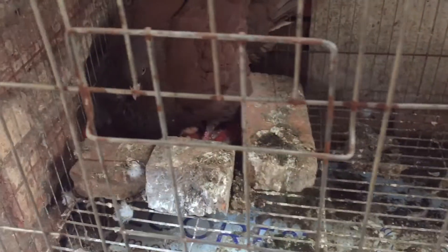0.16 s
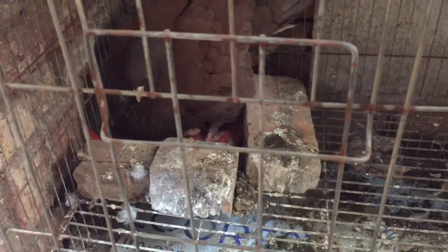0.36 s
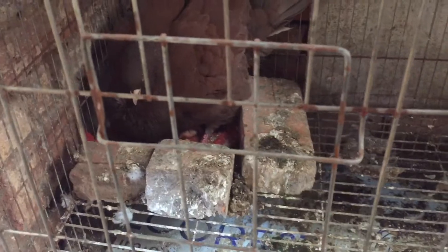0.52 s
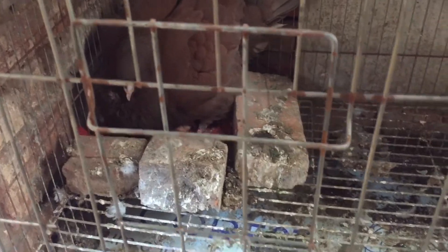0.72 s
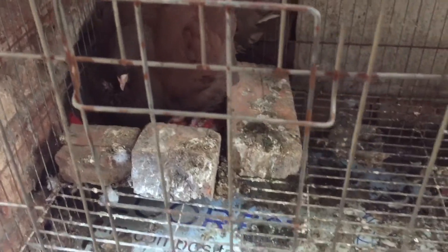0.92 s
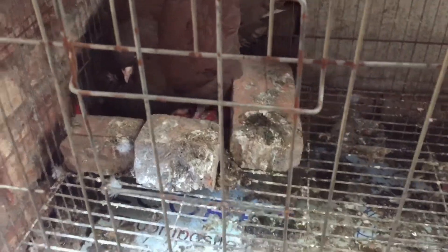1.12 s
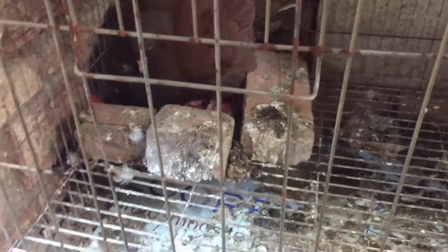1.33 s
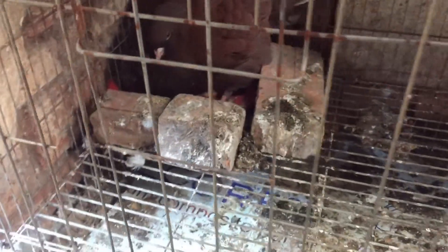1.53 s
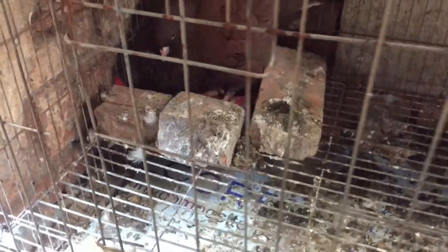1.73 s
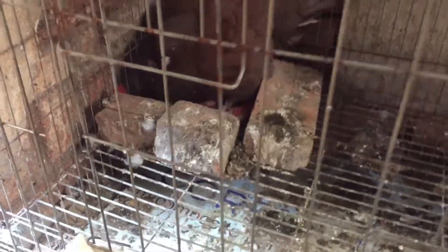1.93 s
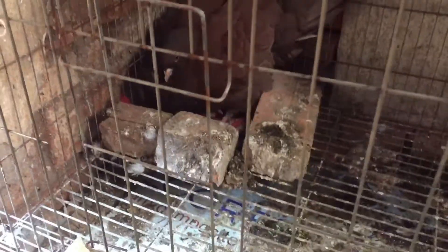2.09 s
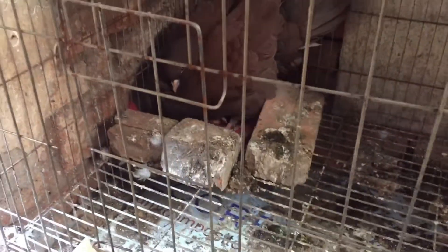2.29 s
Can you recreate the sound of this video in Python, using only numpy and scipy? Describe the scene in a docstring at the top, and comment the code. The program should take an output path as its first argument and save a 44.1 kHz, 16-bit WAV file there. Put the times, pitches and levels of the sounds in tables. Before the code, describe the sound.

Pigeon cooing, close and low: a clear gliding coo at 0.1-0.3 s turns hoarse and growling, ending in a gulp at 0.5. Faint higher notes from a farther bird come around 0.65 and 1.0. Short gulps follow at 1.1, 1.27 and 1.36, then growling from 1.5. Wire knocks peak near 1.75 amid rustling; hoarse coos fade to a low hum by 2.2. Short brick echoes, quiet rumbling yard.

```python
"""A wire cage before a brick nest corner in a yard, in mono, with pigeons cooing close by.
The near bird's clear coos and tonal gulps are gliding sines, its hoarse notes and a last low hum fluttering ones;
its growl and single gulps are also soft pushes that ring the air of throat and nest corner. A second bird,
farther off, answers higher in sines. Feet and feathers rustle as noise bursts that set the wire ringing; knocks
strike its modes. Brick walls return short echoes, and the yard is flickering noise over a lumpy low rumble."""
import sys
import numpy as np
from scipy import signal
from scipy.fft import rfft, irfft
from scipy.io import wavfile

SR = 44100
rng = np.random.default_rng(int(sys.argv[2]) if len(sys.argv) > 2 else 0)


def invert_db(level):
    """Linear amplitude ratio for a level in decibels (20 dB per decade), elementwise."""
    return 10 ** (np.asarray(level, dtype=float) / 20)


def master(y):
    """Save y as 16-bit WAV."""
    cut = np.clip(np.atleast_2d(y).T, -1, 1)
    pcm = np.round(cut * 32767)  # scale
    wavfile.write(sys.argv[1], SR, pcm.astype(np.int16))


N = 103635
T = np.arange(N) / SR   # time in s


def rms_one(x):
    """Scale a signal to rms 1."""
    return x / np.sqrt(np.mean(x ** 2) + 1e-20)


def drift(rate_hz):
    """Slow random wander of rms 1: white noise through two equal low-pass poles at rate_hz."""
    pole = np.exp(-2 * np.pi * rate_hz / SR)
    settle = 20000   # samples dropped while the filter fills
    white = rng.standard_normal(N + settle)
    return rms_one(signal.lfilter([1], [1, -2 * pole, pole * pole], white)[settle:])


def band(x, low_hz, high_hz, order=2):
    """Butterworth band-pass."""
    high_hz = min(high_hz, .45 * SR)
    return signal.sosfilt(signal.butter(order, [low_hz, high_hz], "band", fs=SR, output="sos"), x)


def strike(start_s, level_db, centre_hz, off_db, modes):
    """Each event softly pushes all modes into decaying rings; off_db is lost one octave off its centre."""
    mode_spread_db, push_cycles = 2.0, 1.4   # chance in a mode's strength; length of a push
    chance = rng.standard_normal((len(start_s), len(modes)))
    out = np.zeros(N)
    for k, (hz, mode_db, t60_s) in enumerate(modes):
        off_centre_db = off_db * np.log2(hz / centre_hz) ** 2
        push_db = level_db + mode_db - off_centre_db + mode_spread_db * chance[:, k]
        ring = np.zeros(N)
        np.add.at(ring, (start_s * SR).astype(int), invert_db(push_db))
        turn = np.exp(2j * np.pi * hz / SR)   # rotation of the mode per sample
        decay = invert_db(-60 / (t60_s * SR))
        soften = np.exp(-2 * hz / (push_cycles * SR))
        # one ringing pole, then two quickly decaying ones that round off the onset
        for pole, gain in ((decay, 1), (soften, 1 - soften), (soften, 1 - soften)):
            ring = signal.lfilter([gain], [1, -pole * turn], ring + 1e-18)
        out += ring.imag
    return out


def sine_notes(tables, waver_share, shimmer_db, rate_hz):
    """Sines with a faint octave follow each note's pitch and level while both waver at random."""
    edge_s, octave_db = 0.0056, -40   # fade outside each end of a note; second partial
    out, waver, shimmer = np.zeros(N), drift(rate_hz), drift(rate_hz)
    for rows in tables:
        s, hz, db = np.transpose(rows)
        pitch = np.interp(T, s, hz) * (1 + waver_share * waver)
        phase = 2 * np.pi * np.cumsum(pitch) / SR
        edge = np.clip(np.minimum(T - s[0], s[-1] - T) / edge_s + 1, 0, 1)
        level = invert_db(np.interp(T, s, db) + shimmer_db * shimmer)
        tone = np.sin(phase) + invert_db(octave_db) * np.sin(2 * phase)
        out += np.sqrt(2) * edge * level * tone   # sqrt(2): a sine of rms 1
    return out


# voice of the near bird's clear notes: pitch waver_share, level shimmer_db, rate_hz
CLEAR_VOICE = (.01, 1.2, 40)
# clear coos and tonal gulps of the near bird, one list a note: time_s, pitch_hz, level_db
CLEAR_NOTES = [
    [(.085, 436.7, -33.5), (.11, 377, -21), (.12, 426, -30.5), (.132, 366, -5), (.148, 337.7, -22.5),
     (.185, 345.7, -10.5), (.265, 367.5, -9.5), (.28, 346, -17)],
    [(.283, 396.5, -17.5), (.3, 396, -3.5), (.318, 407, -22.5)],
    [(1.266, 375, -4), (1.29, 413, -18.5), (1.301, 397, -43), (1.312, 375, -26), (1.335, 354, -31)],
    [(1.987, 310.4, -7.5), (1.997, 270, -22)],
    [(.96, 371.8, -19), (.985, 380, -26)],
    [(1.359, 302.2, -8.5), (1.385, 278, -21.5)],
    [(1.521, 303.2, -9), (1.545, 266, -21.5)],
    [(1.651, 340, -15), (1.685, 294, -25)],
]


def clear_notes():
    """The near bird's clear coos and tonal gulps: gliding sines with little waver."""
    return sine_notes(CLEAR_NOTES, *CLEAR_VOICE)


# voice of the fluttering notes: pitch waver_share, level shimmer_db, rate_hz
FLUTTER_VOICE = (.03, 3.0, 60)
# hoarse notes of the near bird, and last a low fluttering hum, one list each: time_s, pitch_hz, level_db
FLUTTER_NOTES = [
    [(.325, 337, -25.5), (.36, 345.8, -20), (.41, 388.6, -14), (.445, 339.3, -18), (.478, 295, -15),
     (.495, 295, -9.5)],
    [(1.745, 325, -13.5), (1.79, 342, -23), (1.84, 352, -16.5), (1.866, 363, -20.5)],
    [(1.88, 319.3, -17), (1.92, 319.8, -19.5), (1.95, 295, -19.5), (1.974, 296, -16)],
    [(2.115, 169.4, -33.5), (2.16, 142.4, -27.5), (2.195, 131.3, -22.5), (2.225, 154.5, -39),
     (2.29, 157, -45.5)],
]


def fluttering_notes():
    """Hoarse notes and a low hum that flutter: sines whose pitch and level waver fast and widely."""
    return sine_notes(FLUTTER_NOTES, *FLUTTER_VOICE)


# air modes of throat and nest corner, also rung by the gulps: mode_hz, level_db, t60_s
HOLLOW = [(207.4, -11.5, 0.18), (229.4, -3.5, 0.13), (295, -3, 0.2), (335, -5, 0.13), (375, -3.5, 0.18),
          (395.6, -7, 0.19), (540.2, -8, 0.14), (566, -5, 0.13), (728, -8, 0.097)]
# course of the growl: time_s, level_db, centre_hz
GROWLS = [(0.238, -45, 292), (.27, -18.5, 300), (0.331, -20, 320), (.44, -13.5, 320), (.51, -19, 324),
          (.6, -40, 315), (.68, -28.5, 387), (.76, -37.5, 234), (0.793, -54, 232), (1.521, -31, 262),
          (1.568, -18.5, 226), (1.608, -20, 292), (1.644, -14.5, 327), (1.7, -36, 295), (1.76, -30.5, 270),
          (1.95, -17.5, 287), (2.06, -28, 303), (2.21, -37, 307), (2.26, -62, 280)]


def growls():
    """Throat pulses, uneven in timing and strength, ring the hollow."""
    pulses_per_s, jitter = 95, .3   # median rate; spread of the log interval
    pulse_spread_db, off_db = 2.0, 12.5
    chance = rng.standard_normal((400, 2))
    times = np.cumsum(np.exp(jitter * chance[:, 0])) / pulses_per_s
    s, db, hz = np.transpose(GROWLS)
    on = times < s[-1]
    level_db = np.interp(times, s, db) + pulse_spread_db * chance[:, 1]
    return strike(times[on], level_db[on], np.interp(times[on], s, hz), off_db, HOLLOW)


# single gulps: start_s, level_db, centre_hz, off_db (loss one octave off the centre)
GULPS = [(.013, -20.5, 324, -0.5), (.498, -7.5, 280, 9), (0.948, -16.5, 212, 5), (1.107, -10.5, 286, 14),
         (1.355, -7, 468, 51), (1.455, -28, 327, 10), (1.521, -13, 417, 10.5), (1.72, -8, 266, 10),
         (1.738, -12.5, 330, 36)]


def gulps():
    """Each gulp is one push into the hollow."""
    return strike(*np.transpose(GULPS), HOLLOW)


# wire modes of the cage: mode_hz, level_db (for knocks), t60_s (for knocks)
WIRE = [(1280, -15, 0.088), (1680, -4, 0.018), (2023, -11.5, 0.059), (2430, -8.5, 0.045), (2742, -8, 0.14),
        (3250, 4.5, 0.025), (3860, -9, 0.052), (4500, -2.5, 0.04), (5865, -8, 0.034), (7140, 8.5, 0.027)]
# knocks on the wire: start_s, level_db, centre_hz
KNOCKS = [(0.711, -34, 3250), (0.945, -23.5, 1680), (1.29, -21.5, 2430), (1.446, -20, 1280),
          (1.501, -12.5, 1280), (1.63, -20.5, 2570), (1.652, -24.5, 3960), (1.722, -7.5, 1950),
          (1.753, 1, 1630), (1.754, -11.5, 4580), (1.766, -9.5, 1700), (1.766, -16, 4860),
          (2.007, -26, 2100)]


def knocks():
    """Each knock rings mostly the wire modes close to its centre."""
    return strike(*np.transpose(KNOCKS), 62, WIRE)   # 62 dB lost one octave off the centre


# voice of the farther bird: pitch waver_share, level shimmer_db, rate_hz
FAR_VOICE = (.06, 3.5, 120)
# notes of the farther bird, one list a note: time_s, pitch_hz, level_db
FAR_NOTES = [
    [(.647, 564, -20.5), (.664, 560, -36.5)],
    [(.679, 723, -24.5), (.7, 732, -31.5), (.75, 686, -46)],
    [(1.015, 659, -27), (1.055, 684, -51.5)],
    [(2.058, 533.6, -33), (2.09, 636, -30.5), (2.14, 670, -37)],
]


def far_notes():
    """The farther bird's higher notes: sines that waver faster than the near bird's."""
    return sine_notes(FAR_NOTES, *FAR_VOICE)


# rustles of feet and feathers: start_s, length_s, level_db, centre_hz, width_octaves
RUSTLES = [(0, 0.077, -41.5, 1400, 1.5), (0.095, 0.081, -48.5, 1880, 1.1), (0.222, 0.036, -45.5, 3520, 1),
           (0.49, 0.0076, -34, 4070, 10), (0.537, 0.026, -42, 10500, 0.84), (0.601, 0.057, -46, 2770, 0.72),
           (0.908, 0.13, -52.5, 3580, 1.6), (1.205, 0.18, -41, 2210, 0.71), (1.487, .04, -39, 2570, 1.1),
           (1.526, 0.212, -34.5, 895, 0.88), (1.637, 0.022, -35, 3600, 1.3),
           (1.694, 0.035, -37.5, 3430, 0.8), (1.748, 0.035, -30, 5200, 1.3),
           (2.001, 0.0095, -36, 4500, 1.8), (1.759, 0.094, -37, 800, 0.26), (2.098, 0.057, -45.5, 870, 0.2),
           (2.317, .03, -46.5, 8060, 0.16)]


def rustles():
    """Grainy band-passed noise bursts that rise, hold and die."""
    rise_share, t60_s = 0.081, .09   # share of the length spent rising; decay after it
    grain_db = 2 * (drift(290) + drift(27))
    grainy = rng.standard_normal(N) * invert_db(grain_db)
    out = np.zeros(N)
    for s, length, db, hz, octaves in RUSTLES:
        i = slice(int(s * SR), int((s + length + t60_s) * SR))
        t = T[i] - s
        rise = np.minimum(t / (rise_share * length), 1)
        decay = invert_db(-60 * np.maximum(t - length, 0) / t60_s)
        half = 2 ** (octaves / 2)
        noise = rms_one(band(grainy[i], hz / half, hz * half, order=1))
        out[i] += invert_db(db) * rise * decay * noise
    return out


def wire_ring(x):
    """Rustling excites the wire modes as broad resonances; the ringing wanders from mode to mode."""
    width_hz, level_db, wander_db = 119, 5.5, 5.0
    pole = np.exp(-np.pi * width_hz / SR)
    rise = np.array([1, 0, -1]) * (1 - pole * pole) / 2
    out = np.zeros(N)
    for k, (hz, _, _) in enumerate(WIRE):
        ring = [1, -2 * pole * np.cos(2 * np.pi * hz / SR), pole * pole]
        out += (-1) ** k * signal.lfilter(rise, ring, x) * invert_db(wander_db * drift(16))
    return invert_db(level_db) * out


def walls(x):
    """Echoes off near brick walls: eight feedback delays of alternating sign, without the direct sound."""
    t60_s, level_db = 0.27, -20
    z = np.exp(-2j * np.pi * np.arange(N + 1) / (2 * N))   # one sample of delay at each frequency
    delays = (np.geomspace(.009, .03, num=8) * SR).astype(int)
    echo = 0
    for k, delay in enumerate(delays):
        feedback = invert_db(-60 * delay / SR / t60_s)
        echo = echo + (-1) ** k * (1 / (1 - feedback * z ** delay) - 1)
    return invert_db(level_db) * irfft(rfft(x, 2 * N) * echo)[:N]


# colour of the yard's noise: band_hz, level_db (relative, per Hz)
YARD = [(30, -12), (70, -24.5), (250, -21), (550, -23), (900, -15), (3400, -22), (9000, -30.5),
        (16000, -33.5)]
# level of the low rumble: time_s, level_db
RUMBLE = [(0, -31.5), (.75, -34.5), (.85, -46), (1.0, -30), (1.3, -36.5), (1.58, -30), (1.8, -26),
          (2.05, -30.5), (2.35, -42.5)]


def yard():
    """Half-octave bands of noise, each flickering in level, over a lumpy low rumble."""
    level_db, flicker_db, lumpy_db = -49, 1.5, 5.5
    edges = 25 * 2 ** np.arange(0, 9.6, .5)
    white = rng.standard_normal((2, N))   # neighbouring bands use different noise
    hz, db = np.transpose(YARD)
    air = np.zeros(N)
    for k, (low, high) in enumerate(zip(edges, edges[1:])):
        band_db = np.interp(np.log(low * high) / 2, np.log(hz), db)
        air += invert_db(band_db + flicker_db * drift(2.7)) * band(white[k % 2], low, high)
    low_noise = band(rng.standard_normal(N), 64, 221.4)
    rumble = rms_one(low_noise * invert_db(lumpy_db * drift(19.0)))
    return invert_db(level_db) * rms_one(air) + invert_db(np.interp(T, *np.transpose(RUMBLE))) * rumble


def scene():
    """Birds and cage with their wall echoes, over the yard."""
    birds = clear_notes() + fluttering_notes() + growls() + gulps() + far_notes()
    feet = rustles()
    near = birds + knocks() + feet + wire_ring(feet)
    return (near + walls(near) + yard())[None]


def roll_off(x):
    """The treble ends steeply here."""
    return signal.sosfilt(signal.butter(12, 15800, fs=SR, output="sos"), x)


def record(dry):
    """The microphone signal loses its bass below 45 Hz."""
    bass_cut = signal.butter(3, 45, "high", fs=SR, output="sos")
    mix = signal.sosfilt(bass_cut, dry)
    return roll_off(mix)


dry = scene()
out = record(dry)
master(out)
```